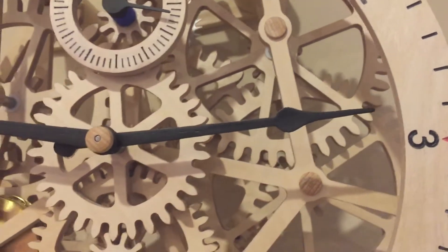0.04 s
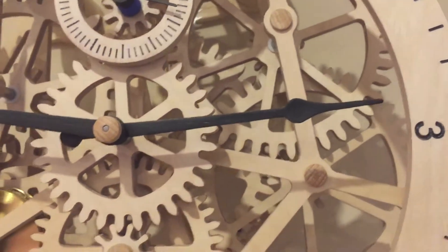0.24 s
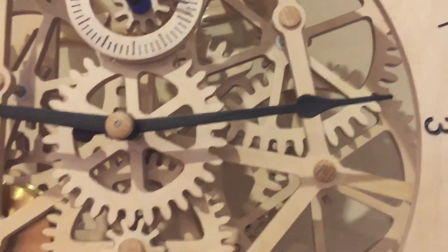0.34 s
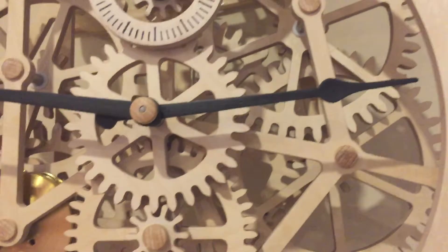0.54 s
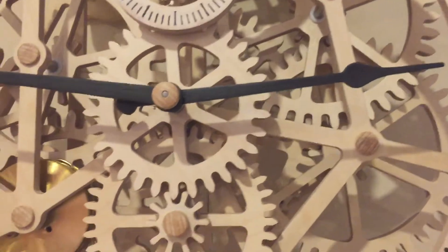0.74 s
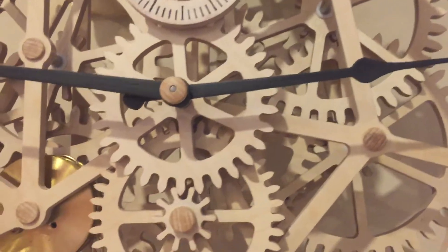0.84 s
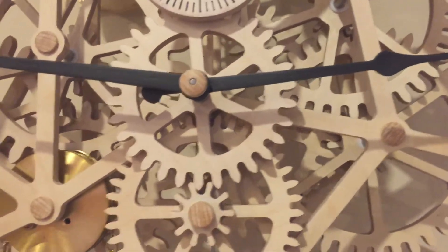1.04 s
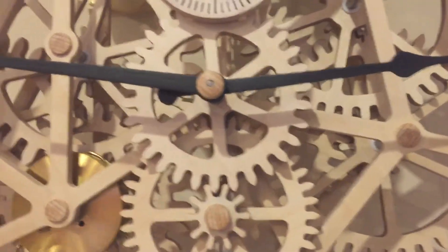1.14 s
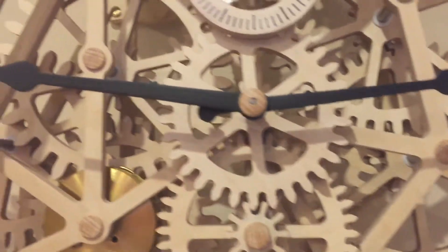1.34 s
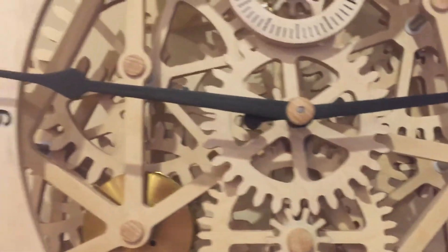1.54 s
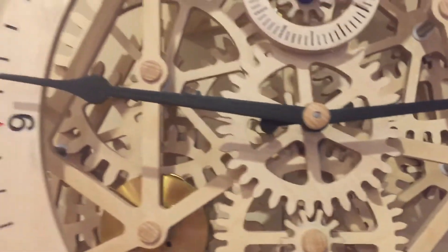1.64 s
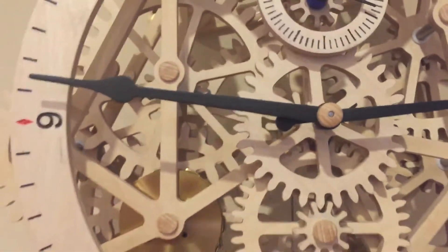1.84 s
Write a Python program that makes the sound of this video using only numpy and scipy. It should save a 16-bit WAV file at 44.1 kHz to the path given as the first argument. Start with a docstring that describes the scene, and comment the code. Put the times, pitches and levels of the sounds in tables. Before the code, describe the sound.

One sharp, ringing wooden clock knock in a quiet room, then light taps and soft handling.

```python
"""A wavering low hum and faint hiss fill a quiet room, and a light tap sounds at the start.
A wooden gear clock knocks once: the frame booms low and the wheels clack and ring.
A soft bump and a few light taps follow, then one small ping.
Handling makes a soft sliding rustle, which ends in more taps and a bump."""
import sys
import numpy as np
from scipy import signal
from scipy.fft import rfft, irfft
from scipy.io import wavfile

SR = 44100
rng = np.random.default_rng(int(sys.argv[2]) if len(sys.argv) > 2 else 0)


def persist_wave(psi):
    """Save psi, clipped to +-1, as 16-bit WAV."""
    counts = np.round(np.clip(psi, -1, 1) * 32767).astype(np.int16)
    wavfile.write(sys.argv[1], SR, np.atleast_2d(counts).T)


N = 83790
T = np.arange(N) / SR


def amp(db):
    """Turns decibels into a number to multiply a sound by."""
    return 10 ** (np.asarray(db) / 20)


def unit(x):
    """Scales a signal to an average (rms) size of 1."""
    return x / np.sqrt(np.mean(x ** 2) + 1e-20)


def read(points, hz):
    """Reads between the rows of a table, on a scale where all octaves are equally wide."""
    pitch_hz, value = np.transpose(points)
    return np.interp(np.log(hz + 1), np.log(pitch_hz), value)


def add(mix, start_s, sound):
    """Adds a sound to the mix at the given time."""
    part = mix[max(round(start_s * SR), 0):]
    part += sound[:len(part)]


def noise(colour, ripple_db=0):
    """Steady noise; the colour table says how strong each pitch is next to the others."""
    gain = amp(read(colour, np.fft.rfftfreq(N, 1 / SR)) + ripple_db)
    return unit(irfft(rfft(rng.standard_normal(N)) * gain, N))


def drift(rate_hz):
    """Random wandering, up to about the given rate."""
    rolloff = 1 + (np.fft.rfftfreq(N, 1 / SR) / rate_hz) ** 4
    return unit(irfft(rfft(rng.standard_normal(N)) / rolloff, N))


def ripples(depth_db, spacing_hz=74.9):
    """The many small resonances of wood: a random boost or cut in dB for each pitch."""
    hz = np.fft.rfftfreq(N, 1 / SR)
    return depth_db * np.interp(hz / spacing_hz, np.arange(len(hz)), rng.standard_normal(len(hz)))


def rise(seconds):
    """A soft start."""
    return 1 - np.exp(-T / seconds)


def mode(pitch_hz, level_db, fade_s):
    """One ringing tone. Here and below, fade_s is the time it takes to fall by 60 dB."""
    return amp(level_db - 60 * T / fade_s) * np.sin(2 * np.pi * pitch_hz * T)


def in_room(x):
    """Lets each pitch in a noise die away as it does in the room."""
    # how long the room rings: pitch_hz, fade_s
    room_fades = [(150, 0.43), (500, 0.52), (1300, 0.56), (2800, 0.45), (6500, 0.49)]
    hz, t, bands = signal.stft(x, SR, nperseg=256)
    fade = amp(-60 * t / read(room_fades, hz)[:, None])
    return signal.istft(bands * fade, SR, nperseg=256)[1][:N]


def background(hum_hz=100.2, hum_db=-59.5, hiss_db=-66):
    """A low hum that wavers and dips briefly now and then, over steady hiss."""
    # slow swell of the hum: time_s, change_db
    swell = [(0, -1.5), (.55, -0.5), (.72, 1.5), (1.05, 4), (1.15, -1.5), (1.32, -3.5), (1.5, 3),
             (1.68, 3.5), (1.76, -4.5)]
    # tone colour of the hiss: pitch_hz, relative_db
    hiss_colour = [(31, -35.5), (47, 0.5), (75, -2), (150, 2.5), (220, -7), (330, -9), (500, -12),
                   (900, -13.5), (2000, -15.5), (4000, -17), (6800, -21)]
    waver = amp(-6.5) * (drift(rate_hz=16) + 1j * drift(rate_hz=16))  # shakes loudness and pitch
    dips_db = -7.5 * np.clip(drift(rate_hz=14.7) - .5, 0, 1)
    level_db = hum_db + np.interp(T, *np.transpose(swell)) + dips_db
    hum = unit(((1 + waver) * np.exp(2j * np.pi * hum_hz * T)).real)
    return amp(level_db) * hum + amp(hiss_db) * noise(hiss_colour)


def taps():
    """Light taps: each sets many close pitches ringing, heard as a fading band of noise."""
    # light taps: start_s, level_db, pitch_hz, width_octaves, fade_s
    light_taps = [(0.0, -61.5, 956, 0.087, 0.54), (0.002, -55.5, 1545, 0.15, 0.16),
                  (.004, -61, 872, 1.34, 0.85), (.218, -65.5, 1750, 0.21, .3), (.229, -60, 615, .1, 0.31),
                  (.657, -66, 1190, 1.08, 0.98), (.716, -64, 2350, .4, 0.15),
                  (.717, -66.5, 4480, 0.044, 0.074), (.775, -67.5, 1550, 1.04, 0.88),
                  (1.275, -70, 1660, 0.24, 0.17), (1.688, -55, 1243, 0.094, 0.2),
                  (1.73, -59, 1380, 0.16, 0.13), (1.803, -51.5, 2200, 0.27, .16),
                  (1.809, -60, 1570, 0.91, 0.86), (1.816, -69, 3600, .04, 0.21),
                  (1.826, -59, 617, 0.21, .35)]
    out, hz = np.zeros(N), np.geomspace(50, 8000, 240)
    for start_s, level_db, pitch_hz, width_octaves, fade_s in light_taps:
        colour_db = -20 * np.log10(1 + (np.log2(hz / pitch_hz) / width_octaves) ** 2)
        ringing = noise(np.c_[hz, colour_db], ripples(depth_db=3))
        add(out, start_s, amp(level_db - 60 * T / fade_s) * rise(.0016) * ringing)
    return out


def knock(wheels_s=.257, wheels_db=-47.5, frame_s=.2338):
    """Quick hits on one wooden body: the hardest sets the wheels ringing, and the frame booms below."""
    # hits after the first light touch, up to the rebound: start_s, level_db
    hits = [(.246, -52.5), (.258, -44), (.265, -47), (.293, -52.5), (.322, -54), (.376, -59)]
    # tone colour of the wooden clack: pitch_hz, relative_db
    clack_colour = [(120, -23), (205, -9.5), (350, -8.5), (460, -24), (640, -11.5), (820, -14.5), (980, -6),
                    (1060, -10), (1250, -2.5), (1400, -6.5), (1530, -3.5), (1750, -9), (2000, -10),
                    (2460, -12), (2950, -13.5), (3200, -14.5), (3700, -15), (4300, -21.5), (5400, -22.5),
                    (6900, -28)]
    # ringing tones of the wheels: pitch_hz, relative_db, fade_s
    wheel_tones = [(319, -6, .45), (365, -7, .35), (619, -11, .55), (926, -9, .55), (1140, -3, .5),
                   (1180, -6, .52), (1244, 1, .53), (1280, -6, .55), (1404, -6, .5), (1515, -2, .48),
                   (1667, -8, .55), (1848, -5, .5), (2142, -6, .42), (2460, -6, .45)]
    # low tones of the frame, close enough to throb together: pitch_hz, level_db, fade_s
    frame_tones = [(120.8, -32.7, .55), (134.2, -32.7, .31), (153, -54, .5), (207, -56, .3)]
    out, body = np.zeros(N), ripples(depth_db=4)
    for start_s, level_db in hits:
        add(out, start_s, amp(level_db) * rise(.0015) * in_room(noise(clack_colour, body)))
    wheels = sum(rng.choice([-1, 1]) * mode(*tone) for tone in wheel_tones)
    add(out, wheels_s, amp(wheels_db) * rise(.0084) * wheels)
    # neighbouring tones start by swinging opposite ways
    frame = sum((-1) ** (k + 1) * mode(*tone) for k, tone in enumerate(frame_tones))
    add(out, frame_s, rise(.004) * frame)
    return out


def bumps():
    """Soft thuds of handling, each a low tone that dies quickly."""
    # soft thuds: start_s, level_db, pitch_hz, fade_s
    thuds = [(.672, -44.5, 108, 0.2), (0.69, -54, 198.4, 0.15), (1.812, -43.5, 133, 0.18),
             (1.822, -60, 300, .3), (1.835, -58.5, 213, 0.26)]
    out = np.zeros(N)
    for start_s, level_db, pitch_hz, fade_s in thuds:
        add(out, start_s, rise(.0041) * mode(pitch_hz, level_db, fade_s))
    return out


def ping(start_s=1.2, echo_db=-14):
    """One small, short ping with a little echo from the room."""
    out = np.zeros(N)
    ring = rise(.0016) * mode(pitch_hz=1841, level_db=-42.5, fade_s=.031)
    room = in_room(rng.standard_normal(N))
    echo = signal.fftconvolve(ring, room / np.linalg.norm(room))[:N]
    add(out, start_s, ring + amp(echo_db) * echo)
    return out


def rustle(grain_db=.5):
    """A grainy slide of handling that starts as a bright swish and ends as a duller rub."""
    # loudness of the swish and of the rub: time_s, level_db
    swish_levels = [(1.19, -85), (1.22, -68.5), (1.42, -71), (1.52, -62.5), (1.585, -53), (1.64, -54),
                    (1.7, -56), (1.78, -67.5), (1.9, -96)]
    rub_levels = [(1.2, -76.5), (1.42, -83), (1.47, -68.5), (1.52, -70), (1.61, -71.5), (1.64, -56.5),
                  (1.7, -55.5), (1.738, -59.5), (1.765, -65), (1.85, -77)]
    # tone colour of each: pitch_hz, relative_db
    swish_colour = [(300, -19.5), (1000, -11), (1700, -5.5), (2300, -5.5), (3100, 1), (4300, 2),
                    (5000, -3.5), (5900, 2), (6900, -5)]
    rub_colour = [(150, -10), (370, -3), (500, -11), (750, -5), (1050, -5), (1240, 0), (1420, -5.5),
                  (1720, -7.5), (1980, 2), (2300, -7), (4000, -26)]
    swish_db = np.interp(T, *np.transpose(swish_levels), left=-120)
    rub_db = np.interp(T, *np.transpose(rub_levels), left=-120)
    swish = amp(swish_db) * noise(swish_colour, ripples(depth_db=2.5))
    rub = amp(rub_db) * noise(rub_colour, ripples(depth_db=1.5))
    grain = unit(amp(grain_db * drift(rate_hz=150)))
    return (swish + rub) * grain


def scene():
    """All the sounds meet at one microphone."""
    return (background() + taps() + knock() + bumps() + ping() + rustle())[None]


def record(dry):
    """The recorder cuts off the highest treble."""
    cutoff_hz = 6970
    low_pass = signal.firwin(601, cutoff_hz, window=("kaiser", 8), fs=SR)
    return signal.oaconvolve(dry, low_pass[None], "same")


dry = scene()
out = record(dry)
persist_wave(out)
```